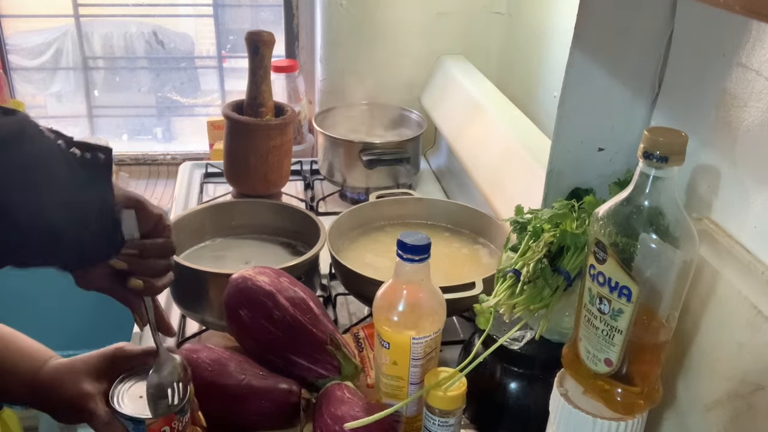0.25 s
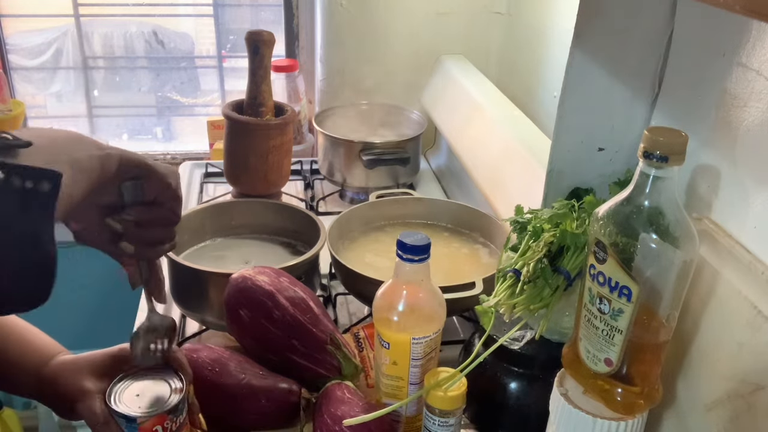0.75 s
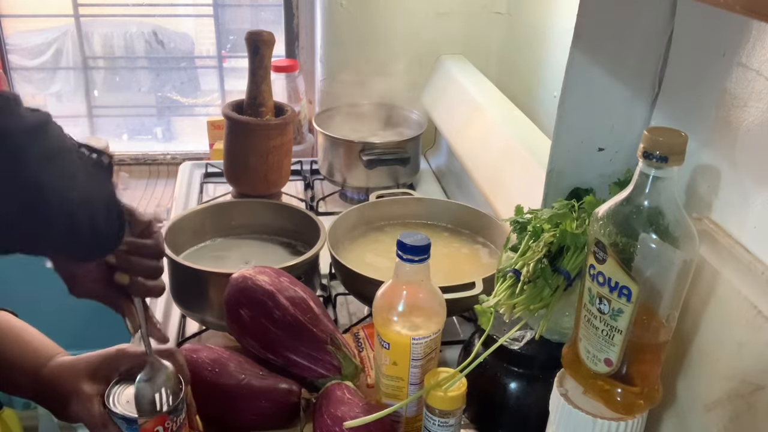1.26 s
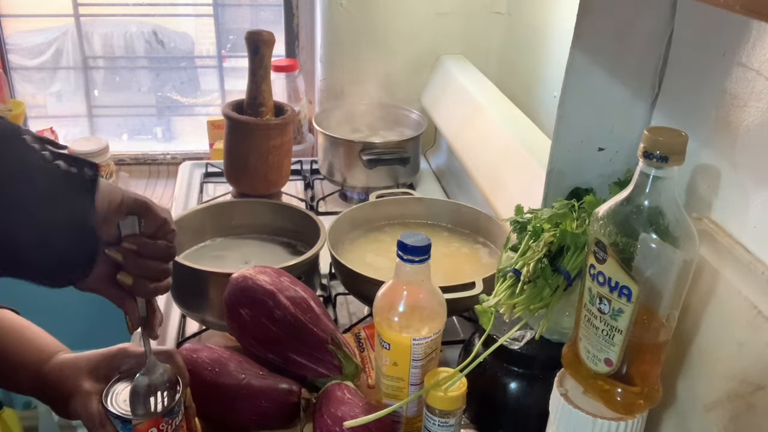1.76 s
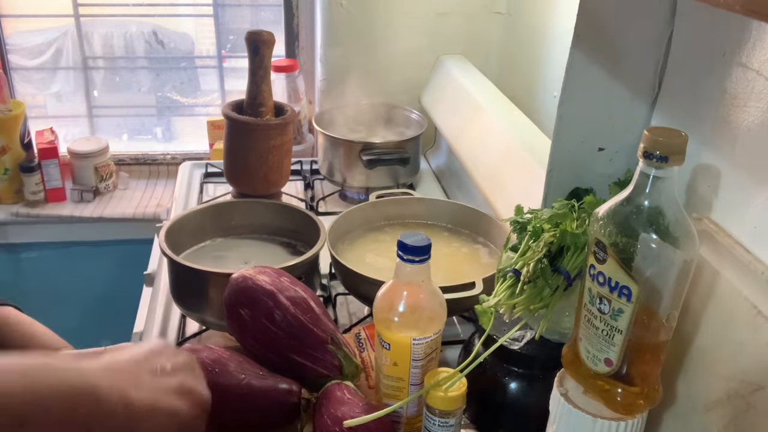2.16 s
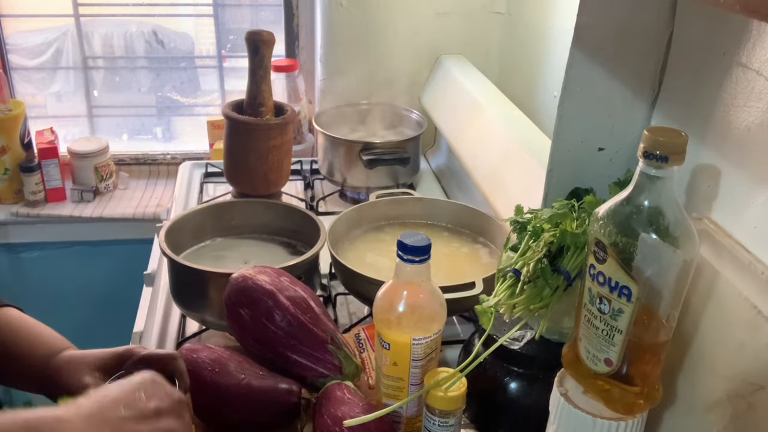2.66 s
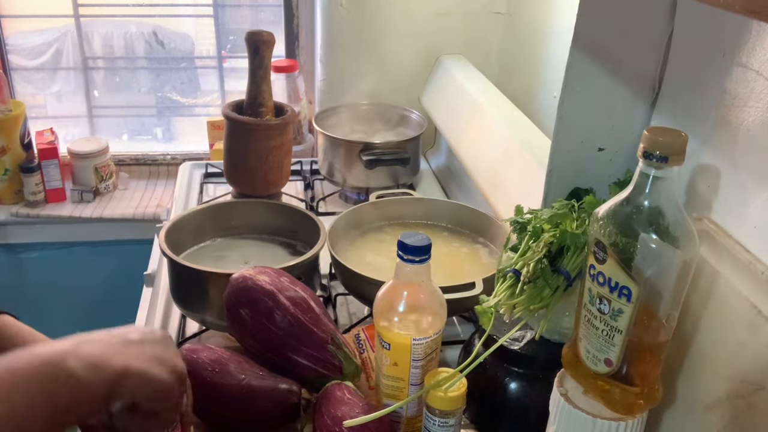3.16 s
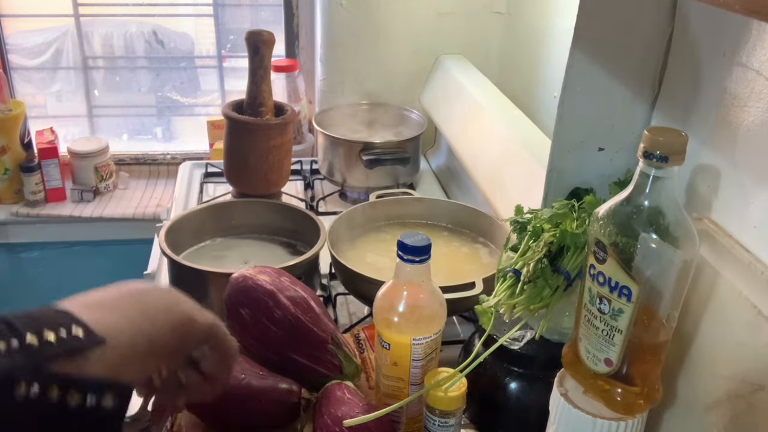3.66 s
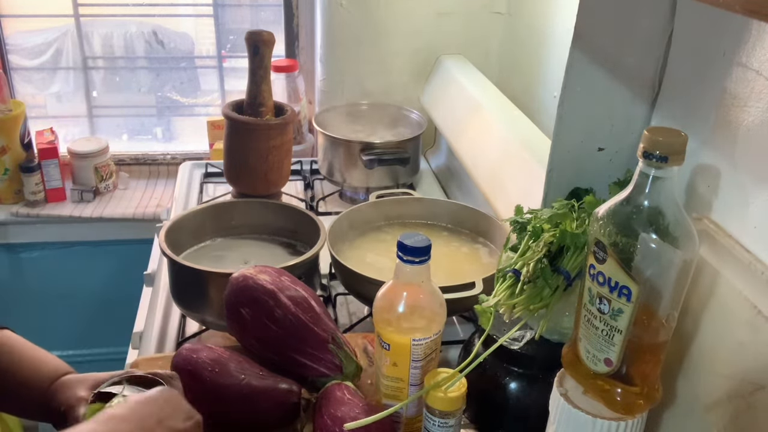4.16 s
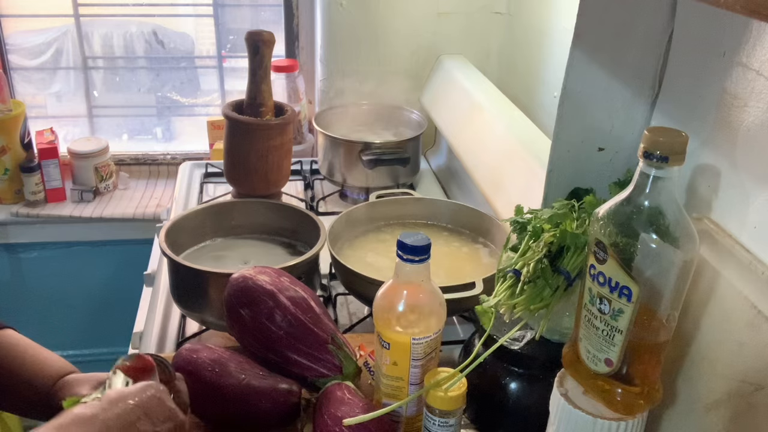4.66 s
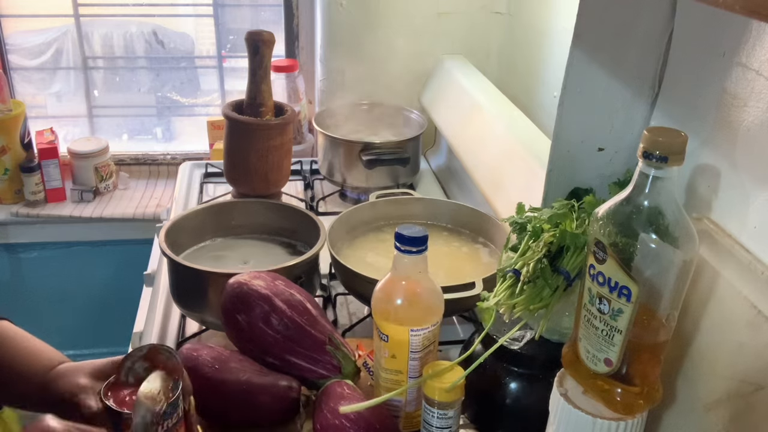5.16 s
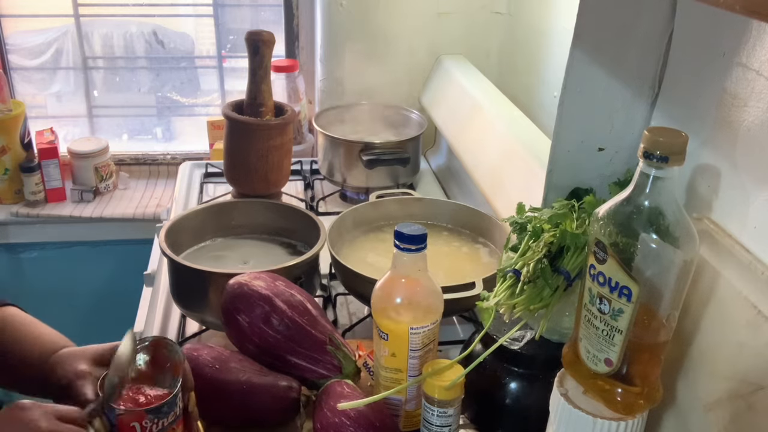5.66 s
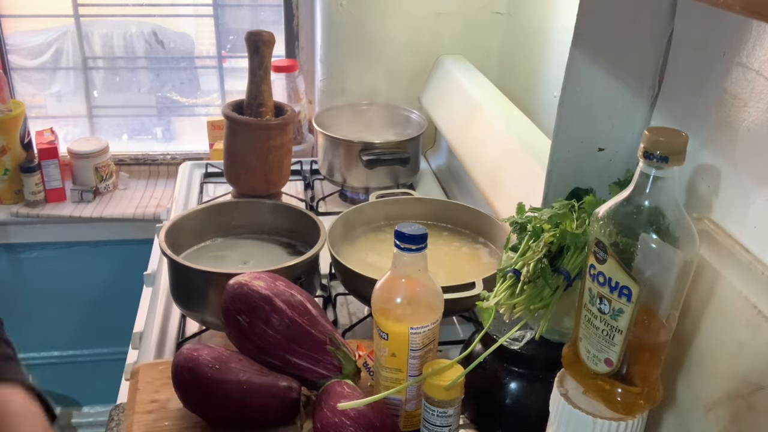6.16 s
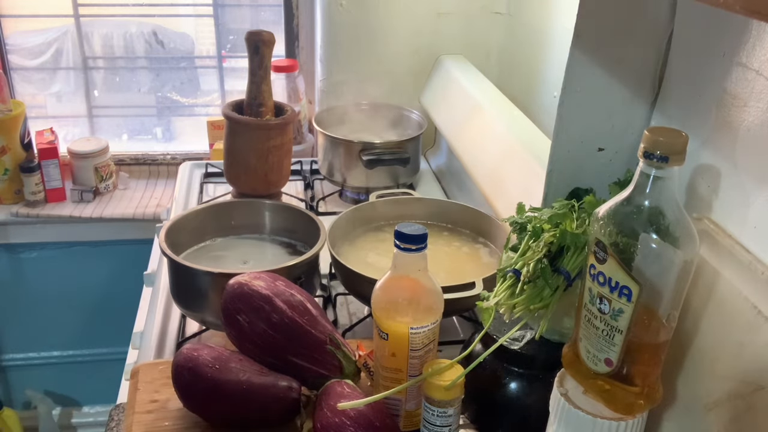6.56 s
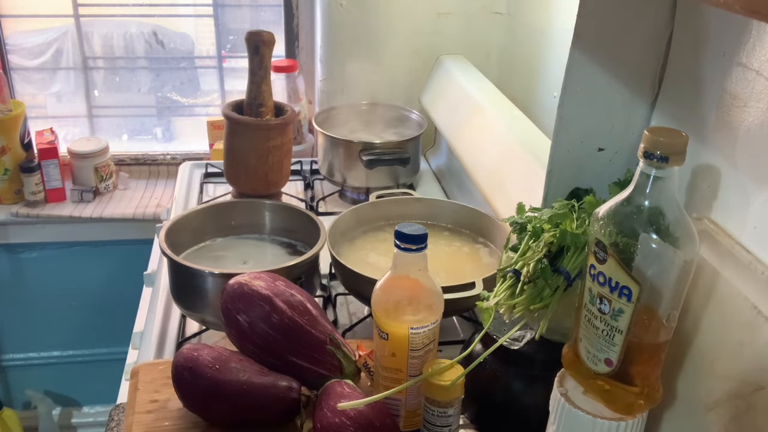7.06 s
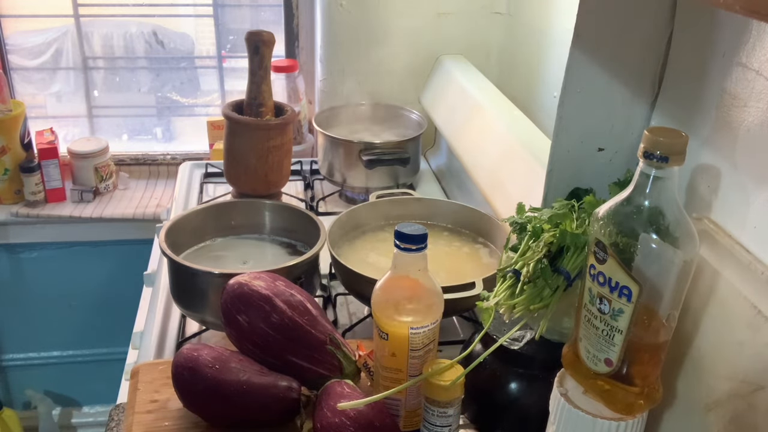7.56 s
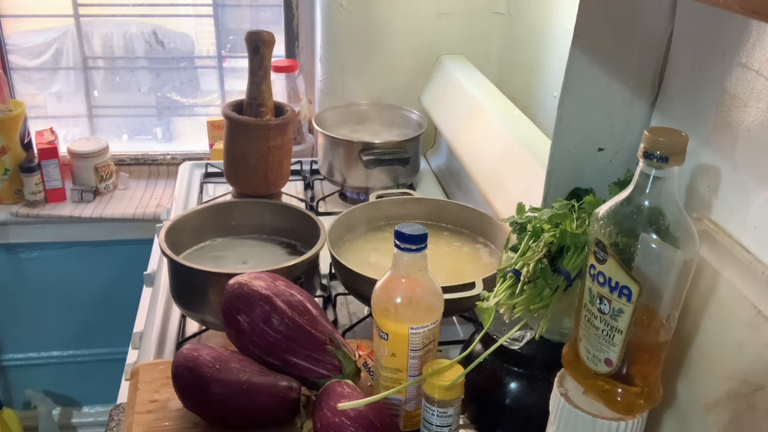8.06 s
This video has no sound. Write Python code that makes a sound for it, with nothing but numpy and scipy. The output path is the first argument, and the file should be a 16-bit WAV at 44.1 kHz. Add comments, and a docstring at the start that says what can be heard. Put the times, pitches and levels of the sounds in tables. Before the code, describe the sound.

A steel spoon prises at the lid of a small full tin, close to the microphone in a home kitchen. It taps and scrapes while the tin thuds on the counter and hands rub softly. A sharp snap comes midway, then three louder ones that leave the spoon ringing. Dull set-downs and two clinks finish. A compressor hums and pots simmer on gas throughout.

```python
"""A spoon prises the lid off a small full tin on a kitchen counter. From the start a compressor hums,
pots simmer and gas rings hiss behind; hands and sleeves rub softly. For three seconds the spoon taps
and scrapes, ringing the tin, which thuds on the counter. A long faint scrape leads to a set-down and a
snap just before 4 s. The loudest snaps follow at 5-5.6 s and leave the spoon ringing; then come dull
set-downs at 7 s and two last clinks. Two close microphone ports hear the treble in opposite phase."""
import sys
import numpy as np
from scipy import signal
from scipy.fft import rfft, irfft
from scipy.io import wavfile

SR = 44100
rng = np.random.default_rng(int(sys.argv[2]) if len(sys.argv) > 2 else 0)


def inscribe(sig):
    """Save sig as 16-bit PCM at rate SR to the path in sys.argv[1].

    A 1-D sig is mono; a 2-D sig holds one channel per row.
    Samples are clipped to [-1, 1] before scaling.
    """
    pcm = np.round(np.clip(np.atleast_2d(sig).T, -1, 1) * 32767)
    wavfile.write(sys.argv[1], SR, pcm.astype(np.int16))


N = 366912
TIME = np.arange(N) / SR
HZ = np.maximum(np.arange(N // 2 + 1) * SR / N, 1)


def from_db(db):
    """Decibels to gain."""
    return 10 ** (np.asarray(db) / 20)


def unit_rms(x):
    """Scale to rms 1."""
    return x / np.sqrt(np.mean(x ** 2) + 1e-20)


def at_hz(curve, hz, column=1):
    """Read a curve on a log-frequency axis."""
    curve = np.array(curve)
    return np.interp(np.log(hz), np.log(curve[:, 0]), curve[:, column])


def equalise(x, curve):
    """Apply an EQ curve, with a steep roll-off beyond both ends."""
    roll_off = np.minimum(1, HZ / curve[0][0]) ** 4 * np.minimum(1, curve[-1][0] / HZ) ** 4
    return irfft(rfft(x) * from_db(at_hz(curve, HZ)) * roll_off, N)


def drift(rate_hz):
    """A smooth random modulator, rms 1."""
    hop = 40
    pole = np.exp(-2 * np.pi * rate_hz * hop / SR)
    slow = signal.lfilter([1], [1, -2 * pole, pole * pole], rng.standard_normal(N // hop + 2002))[2000:]
    return np.interp(np.arange(N) / hop, np.arange(len(slow)), unit_rms(slow))


def ring(force, hz, t60):
    """One resonant mode: a unit click starts a decaying sine of height 1."""
    pole, angle = from_db(-60 / (t60 * SR)), 2 * np.pi * hz / SR
    return signal.lfilter([0, np.sin(angle)], [1, -2 * pole * np.cos(angle), pole * pole], force + 1e-18)


def grit(shape, spread_db):
    """Uneven clicks of random sign, one a sample."""
    return from_db(spread_db * np.minimum(rng.exponential(1, shape), 5)) * rng.choice([-1, 1], shape)


def chatter(count, decay_s):
    """For each contact, a quick run of clicks that swells and dies; energy 1."""
    age = np.arange(3000) / SR / decay_s
    bursts = grit((count, len(age)), 6.4) * np.minimum(1, age / 0.8) * np.exp(-age)
    return bursts / np.linalg.norm(bursts, axis=1, keepdims=True)


def strike(times, bursts, levels_db):
    """Lay each burst on one force track, at its time and level."""
    force = np.zeros(N + SR)
    for time, burst, gain in zip(times, bursts, from_db(levels_db)):
        start = round(time * SR)
        force[start:start + len(burst)] += gain * burst
    return force[:N]


# Stereo image, far and near: (frequency [Hz], shared part [0-1], right phase lead [rad])
FAR_IMAGE = [(50, .98, -.4), (170, .75, -.9), (340, .5, -1.9), (690, .7, -3.0), (1300, .35, -3.0),
             (2500, .1, -2.0), (7200, .3, -2.8), (8300, 1, -3.1), (10100, 1, -3.17), (11000, .7, -4.2),
             (12300, 1, -6.2)]
NEAR_IMAGE = [(50, .95, -.4), (200, .8, -.2), (340, .65, .9), (690, .7, 2.5), (950, .6, 1.9),
              (1290, .78, .2), (2400, .6, 0), (4200, .6, -.6), (5700, .6, -2.0), (7400, .9, -2.7),
              (8400, .99, -3.0), (9800, .99, -3.3), (11300, .8, -4.6), (12700, .95, -6.1)]
# Right port EQ, far and near: (frequency [Hz], gain [dB])
FAR_RIGHT_EQ = [(60, 0.5), (180, -2), (260, -14), (350, -1.5), (520, -1), (1000, -2.5), (5000, -3.5),
                (8000, -0.5)]
NEAR_RIGHT_EQ = [(70, 5), (300, 0), (700, 1), (1300, -1), (4400, -2), (15000, 0)]
def mic_ports(pair, image, right_eq):
    """The right port hears part of the left sound, phase-turned, and the rest from a second signal."""
    left, other = pair
    share = np.clip(at_hz(image, HZ), 0, 1)
    turn = np.exp(1j * at_hz(image, HZ, column=2))
    right = share * turn * rfft(left) + np.sqrt(1 - share ** 2) * rfft(other)
    return np.array([left, irfft(right * from_db(at_hz(right_eq, HZ)), N)])


# Room decay: (frequency [Hz], t60 [s])
KITCHEN_DECAY = [(100, 0.51), (1000, 0.27), (4000, 0.3), (14000, 0.2)]
def kitchen(x, wet_db, scatter_s):
    """Two paths, one direct and one scattered off nearby pots, each with a tail dying band by band."""
    t, edges_hz = np.arange(SR // 2) / SR, 80 * 2. ** np.arange(9)
    paths = np.zeros((2, len(t)))
    for low, high in zip(edges_hz, edges_hz[1:]):
        bandpass = signal.butter(2, [low, high], "band", fs=SR, output="sos")
        band = signal.sosfilt(bandpass, rng.standard_normal(paths.shape))
        paths += band * from_db(-60 * t / at_hz(KITCHEN_DECAY, np.sqrt(low * high)))
    paths *= np.minimum(1, t / 0.012) * from_db(wet_db) / np.linalg.norm(paths[0])
    scatter = rng.standard_normal(len(t)) * np.exp(-t / scatter_s)
    paths[0, 0] += 1   # the direct sound
    paths[1] += scatter / np.linalg.norm(scatter)
    return signal.fftconvolve(x[None], paths, axes=1)[:, :N]


# Motor tones: (frequency [Hz], level [dB], waver [dB])
MOTOR_TONES = [(59, -41, .8), (118.2, -51, 1.5), (291, -56, 2), (409, -61, 2), (2121, -78, 1)]
def compressor():
    """The motor's hum wavers in level and phase, placed in the far stereo image."""
    out = np.zeros((2, N))
    for hz, db, waver_db in MOTOR_TONES:
        phase = 2 * np.pi * hz * TIME + .5 * drift(13.7) + [[0], [at_hz(FAR_IMAGE, hz, column=2)]]
        pan = from_db([[0], [at_hz(FAR_RIGHT_EQ, hz)]])
        out += np.sqrt(2) * from_db(db + waver_db * drift(1.5)) * pan * np.sin(phase)
    return out


# Tone of the flames and pots: (frequency [Hz], gain [dB])
STOVE_EQ = [(30, -19), (50, -37), (112, 6.5), (190, -10.5), (300, 6.5), (450, -23.5), (690, -6),
            (1090, -13.5), (3000, -21.5), (6500, -30), (7500, -36), (10800, -36.5), (12300, -44),
            (13200, -83)]
def stove(level_db):
    """Gas flames and simmering pots: a smooth noise bed that breathes slightly."""
    bed = unit_rms(equalise(rng.standard_normal((2, N)), STOVE_EQ))
    return from_db(level_db + .8 * drift(3)) * bed


# Fader moves for the hands: (time [s], rub level [dB], rumble level [dB])
HAND_MOVES = [(0, -75, -46), (.12, -52.5, -36.5), (.3, -57.5, -43.5), (.48, -64, -49), (.76, -42, -46),
              (.9, -54.5, -43.5), (1.35, -73, -43), (1.9, -90, -49.5), (2.5, -91, -38), (2.72, -66, -46),
              (3.05, -75, -29.5), (3.2, -64, -44.5), (3.6, -54.5, -40), (4.1, -48.5, -47),
              (4.5, -105, -44.5), (5.3, -49.5, -45), (6.3, -74.5, -46.5), (7.44, -84, -44),
              (7.54, -52, -45.5), (7.8, -47, -48), (7.92, -65, -47.5), (8.32, -69, -43.5)]
# Tone of friction and of counter rumble: (frequency [Hz], gain [dB])
RUB_EQ = [(1500, -6.5), (3000, -1), (6000, -1), (7500, -6.5), (11000, -7), (13000, -11.5), (14300, -24.5)]
RUMBLE_EQ = [(100, -9.5), (200, 2.5), (330, 2), (450, -1), (800, -8)]
def hands():
    """Skin and cloth rub in the treble; the hands send a lumpy rumble through the counter."""
    times, rub_db, rumble_db = np.transpose(HAND_MOVES)
    rub = unit_rms(equalise(rng.standard_normal((2, N)), RUB_EQ))
    rub *= from_db(np.interp(TIME, times, rub_db) + 2.5 * drift(5))
    rumble = unit_rms(equalise(rng.standard_normal((2, N)), RUMBLE_EQ))
    rumble *= from_db(np.interp(TIME, times, rumble_db) + 2.5 * drift(12))
    return rub + rumble


# Counter resonances: (frequency [Hz], gain [dB], t60 [s])
COUNTER_MODES = [(84, -2, 0.19), (130.7, -5, 0.1), (193.2, 2, 0.075), (289.5, 0.5, 0.12), (331.5, -4, 0.17),
                 (375.3, 0, 0.11), (423.4, -5.5, 0.14), (500.5, -4, 0.11), (545, -9.5, 0.102)]
def counter_thuds(times, thud_db, thud_hz):
    """The tin's weight lands softly, pushing each counter mode for one cycle, slightly late."""
    out = np.zeros(N)
    for k, (hz, db, t60) in enumerate(COUNTER_MODES):
        mode_db = db + rng.normal(0, 2.5, len(times)) + focus_db(hz, thud_hz, 6.5, 6.5)
        cycle = np.hanning(round(SR / hz))
        pushes = np.tile(2 * cycle / cycle.sum(), (len(times), 1))
        lag_cycles = rng.uniform(0.3, 1.386, len(times))
        out += (-1) ** k * ring(strike(times + lag_cycles / hz, pushes, thud_db + mode_db), hz, t60)
    return out


def focus_db(hz, bright_hz, below, above):
    """Modes answer less below and above the struck spot's pitch; slopes in dB per octave."""
    octaves = np.log2(hz / bright_hz)
    return -np.maximum(-below * octaves, above * octaves)


# Drags of the spoon's edge: (time [s], length [s], tin drive [dB], grating level [dB], lid drive [dB])
DRAGS = [(0.054, 0.08, -70.5, -72, -94), (0.453, 0.063, -55, -28, -72), (0.53, 0.025, -72, -44, -90),
         (1.107, 0.067, -58.5, -30, -73), (3.066, 0.73, -76.5, -56, -99), (3.639, 0.068, -66, -31.5, -78),
         (4.25, 0.11, -77, -41.5, -99)]
def scrapes(bite_s=0.048, release_db_per_s=486):
    """The edge digs in, holds and lets go. Returns its grating and its forces on tin and lid."""
    envelopes = np.zeros((3, N))
    for start, length, *levels_db in DRAGS:
        bite = np.clip((TIME - start) / bite_s, 0, 1) ** 2
        release = from_db(-release_db_per_s * np.maximum(TIME - start - length, 0))
        envelopes += from_db(levels_db)[:, None] * bite * release
    on_tin, grating, on_lid = envelopes
    slips = unit_rms(grit(N, 4.0)) * from_db(3 * drift(70))   # the edge grips and slips
    return grating * equalise(slips, RUB_EQ), on_tin * slips, on_lid * slips


# Tone of the hard clack and the sharp crack above it: (frequency [Hz], gain [dB])
CLACK_EQ = [(1800, -14.5), (2600, -4), (4450, 1.5), (5300, -3), (6100, 0.5), (7200, -3)]
CRACK_EQ = [(5500, 1), (8000, 15.5), (10500, 15), (12000, 7), (13500, 10.5), (16000, -30)]
def transients(times, clack_db, crack_db, contact_s):
    """Chattering metal gives each contact its attack: a broad clack and a shorter, brighter crack."""
    gain = np.sqrt(.1 * SR)   # a burst packs the energy of 0.1 s at its level
    clacks = strike(times, gain * chatter(len(times), contact_s), clack_db)
    cracks = strike(times, gain * chatter(len(times), 0.71 * contact_s), crack_db)
    return equalise(clacks, CLACK_EQ) + equalise(cracks, CRACK_EQ)


# Resonances of the full tin: (frequency [Hz], gain [dB], t60 [s])
TIN_MODES = [(598, 15.5, 0.059), (662, 14.5, 0.067), (767, 6.5, 0.078), (906.5, 5.5, 0.068),
             (1125, 6.5, 0.022), (1193, -3.5, 0.062), (1291, 4, 0.049), (1400, 1, 0.035), (1550, 3.5, 0.03),
             (1825, 5, 0.031), (2050, 3.5, 0.04), (2334, -3, 0.025), (2792, 1, 0.053)]
def tin_body(times, blows, tin_db, bright_hz, drag, rim_hz=1200):
    """The tin rings briefly: blows favour modes near their own pitch, drags those near the rim's."""
    out, slopes = np.zeros(N), (21, 13.5)
    for k, (hz, db, t60) in enumerate(TIN_MODES):
        spot_db = focus_db(hz, bright_hz, *slopes) + rng.normal(0, 2, len(times))
        taps = strike(times, blows, tin_db + spot_db)
        rubbing = from_db(focus_db(hz, rim_hz, *slopes)) * drag
        out += (-1) ** k * from_db(db) * ring(taps + rubbing, hz, t60)
    return out


# Resonances of the lid's rim: (frequency [Hz], gain [dB], t60 [s])
LID_MODES = [(3080, 2.5, 0.055), (3345, 2.5, 0.061), (3475, 5.5, 0.03), (4115, 1, 0.048),
             (4210, -20, 0.043), (5950, -6.5, .022)]
# Contacts that catch the rim: (time [s], level [dB], brightest pitch [Hz])
LID_CUES = [(0.515, -41, 4200), (0.53, -24, 4000), (0.553, -38, 6000), (1.125, -38, 5950),
            (1.145, -35, 5950), (1.167, -35.5, 4150), (1.181, -49, 3000), (1.21, -36.5, 3320),
            (3.155, -39, 3500), (3.282, -51, 3330), (3.379, -48.5, 3400), (3.875, -36, 3500),
            (3.879, -25, 3750), (5.09, -30, 3000)]
def lid_rim(blows, drag):
    """The rim pings when caught and squeaks under the dragged edge, each mode coming and going."""
    times, cue_db, bright_hz = np.transpose(LID_CUES)
    out = np.zeros(N)
    for hz, db, t60 in LID_MODES:
        spot_db = focus_db(hz, bright_hz, 30, 30) + rng.normal(0, 2, len(times))
        taps = strike(times, blows, cue_db + spot_db)
        squeak = drag * from_db(5 * drift(15))
        out += from_db(db) * ring(taps + squeak, hz, t60)
    return out


# Resonances of the steel spoon: (frequency [Hz], gain [dB], t60 [s])
SPOON_MODES = [(2370, -6, .08), (2470, -1, .16), (4356, -5, .12), (4480, -3, .2), (6389, -3, .1),
               (8850, -6, .12), (9880, -2, .2), (13070, -3, .13), (13440, 0, .15), (14520, -9, .08)]
# Where each part speaks: (bowl [Hz], neck [Hz], rim [Hz])
SPOON_REGISTERS = [2400, 6000, 13000]
# Blows that leave the spoon free to ring: (time [s], bowl level [dB], neck level [dB], rim level [dB])
SPOON_CUES = [(3.881, -38.5, -24, -55), (5.094, -21.5, -61, -44), (5.339, -12, -59, -32),
              (5.584, -22, -42, -29), (8.21, -71, -18.5, -43), (8.312, -71, -29, -46)]
def spoon():
    """A single click rings clean steel modes; each blow favours bowl, neck or rim."""
    times = [cue[0] for cue in SPOON_CUES]
    out, clicks = np.zeros(N), np.ones((len(times), 1))
    for hz, db, t60 in SPOON_MODES:
        part_db = [at_hz(list(zip(SPOON_REGISTERS, cue[1:])), hz) for cue in SPOON_CUES]
        chance_db = rng.normal(0, 2, len(times))
        out += ring(strike(times, clicks, part_db + chance_db + db), hz, t60)
    return out


# Taps, snaps and set-downs: (time [s], tin level [dB], tin's brightest pitch [Hz], thud level [dB],
# thud's brightest pitch [Hz], clack level [dB], crack level [dB])
CONTACT_CUES = [(0.265, -54, 807, -63, 300, -48, -66), (0.495, -27, 1180, -19, 248, -48, -54),
                (0.529, -21.5, 1820, -27.5, 159, -28, -37), (0.537, -23.5, 1220, -28.5, 330, -42, -60),
                (0.623, -28, 1270, -27, 298, -35.5, -51), (0.925, -41, 1300, -70, 300, -38.5, -60),
                (0.937, -32.5, 1270, -30.5, 252, -50, -56.5), (1.014, -43.5, 1270, -52, 300, -49, -64.5),
                (1.125, -35.5, 1250, -34.5, 296, -40.5, -55.5), (1.183, -40, 1250, -32.5, 296, -45, -73),
                (1.209, -33, 1300, -39, 298, -36, -57), (1.371, -37.5, 960, -33.5, 279, -69, -95),
                (2.128, -41, 1170, -39, 300, -40, -51), (2.204, -40.5, 1230, -66, 300, -60, -80),
                (2.247, -25.5, 1170, -29.5, 342, -44.5, -71), (2.379, -35.5, 1250, -30.5, 334, -71, -90),
                (2.434, -36, 950, -26.5, 295, -64, -79), (2.813, -37.5, 1070, -40, 300, -72, -80),
                (3.048, -34, 1100, -27, 350, -75, -87), (3.156, -33.5, 1380, -48, 300, -46, -64.5),
                (3.209, -48, 1420, -67, 300, -66, -76), (3.282, -46.5, 1380, -40, 300, -68, -72),
                (3.376, -39, 1260, -41, 300, -58, -74), (3.667, -32.5, 1500, -13.5, 357, -41, -67),
                (3.872, -28, 1510, -51, 300, -29, -59), (3.878, -16.5, 1570, -27, 376, -20, -32.5),
                (4.308, -30.5, 1250, -23, 265, -61, -61), (4.421, -47.5, 1860, -39, 300, -49, -61),
                (4.488, -67, 759, -63, 298, -54, -63), (4.508, -41.5, 2220, -43, 300, -48, -66),
                (4.849, -25, 1300, -28, 336, -31, -55.5), (5.081, -30, 1340, -38, 300, -36, -82),
                (5.091, -9.5, 1300, -18.5, 278, -23, -36.5), (5.337, -14.5, 1190, -13, 368, -18.5, -34),
                (5.585, -21, 2170, -62, 300, -21, -34.5), (7.073, -31.5, 894, -12, 180, -40.5, -61.5),
                (7.175, -31, 950, -19, 270, -55, -82), (8.21, -36.5, 1280, -43, 410, -38, -58),
                (8.228, -39.5, 1100, -41, 404, -45, -57), (8.311, -38, 870, -32.5, 300, -29.5, -46)]
def prising(contact_s=0.0053):
    """The spoon works at the lid: contacts and drags ring the metal while the counter thuds below."""
    times, tin_db, bright_hz, thud_db, thud_hz, clack_db, crack_db = np.transpose(CONTACT_CUES)
    attacks = transients(times, clack_db, crack_db, contact_s)
    grating, tin_drag, lid_drag = scrapes()
    blows = .6 * chatter(len(times), contact_s)
    blows[:, 80] += 1   # one firm touch early in the chatter
    metal = tin_body(times, blows, tin_db, bright_hz, tin_drag) + lid_rim(blows, lid_drag)
    return attacks + grating + metal + counter_thuds(times, thud_db, thud_hz) + spoon()


def scene():
    """The tin up close in the room, over a bed of stove, hands and compressor."""
    near = kitchen(prising(), wet_db=-7.5, scatter_s=0.0064)
    bed = mic_ports(stove(level_db=-40) + hands(), FAR_IMAGE, FAR_RIGHT_EQ) + compressor()
    return bed + mic_ports(near, NEAR_IMAGE, NEAR_RIGHT_EQ)


def record(dry):
    """The microphones drop the deepest bass, round the loudest peaks and cut the top."""
    low_cut = signal.butter(2, 35, "high", fs=SR, output="sos")
    high_cut = signal.cheby2(12, 70, 16450, fs=SR, output="sos")
    rounded = np.tanh(signal.sosfilt(low_cut, dry))
    return signal.sosfilt(high_cut, rounded)


dry = scene()
out = record(dry)
inscribe(out)
```